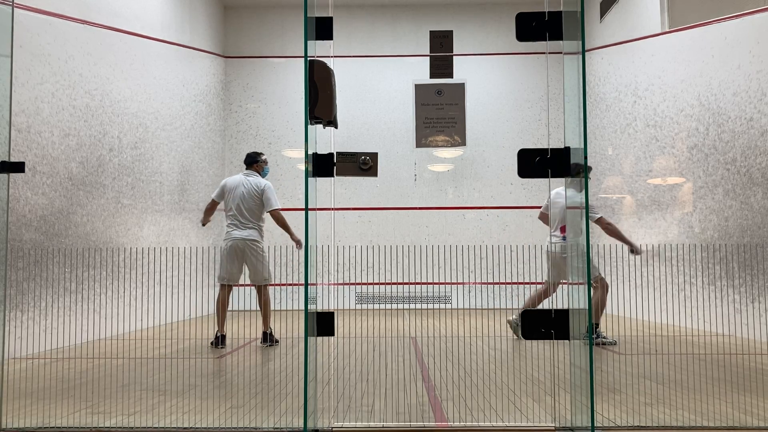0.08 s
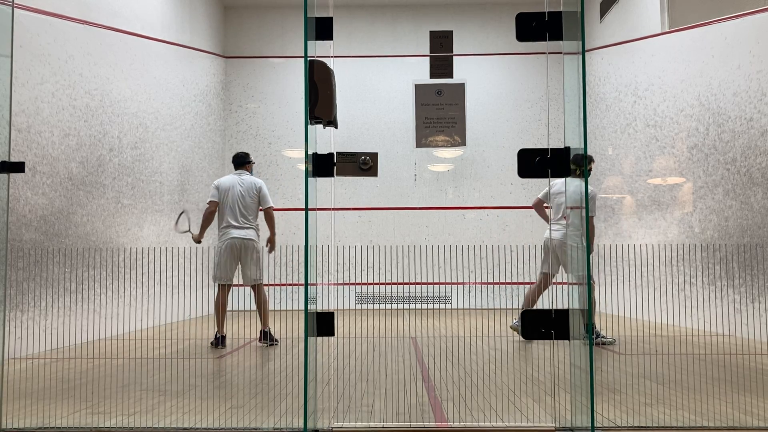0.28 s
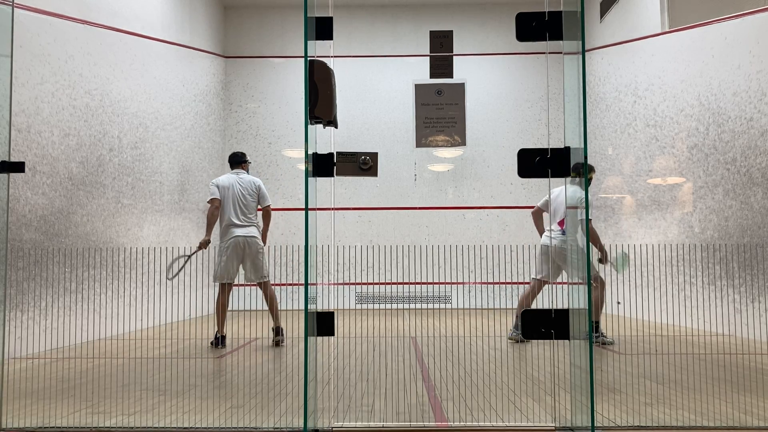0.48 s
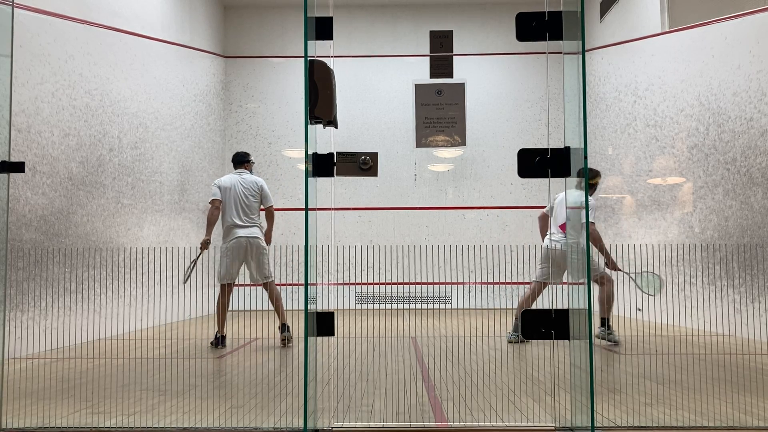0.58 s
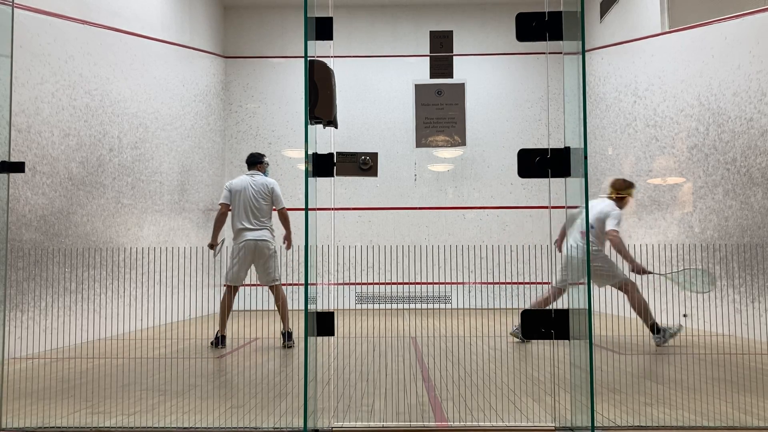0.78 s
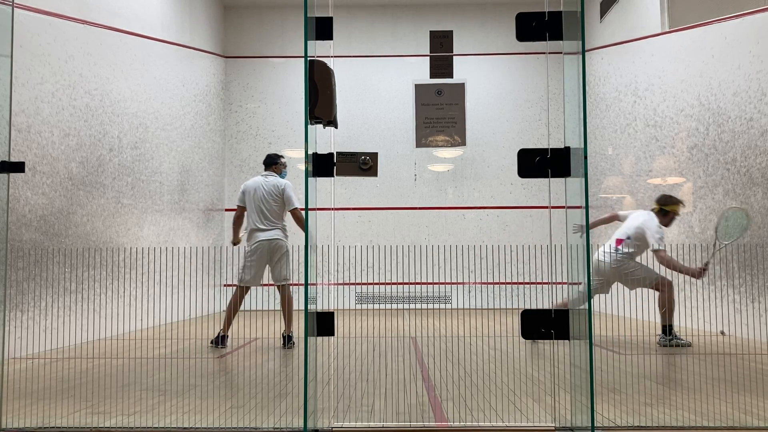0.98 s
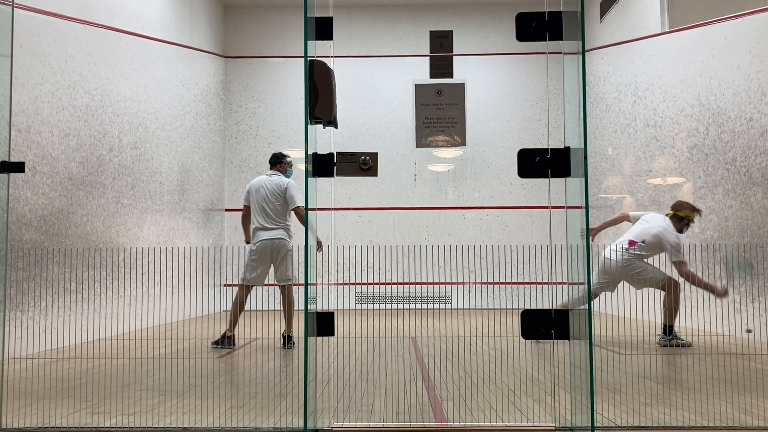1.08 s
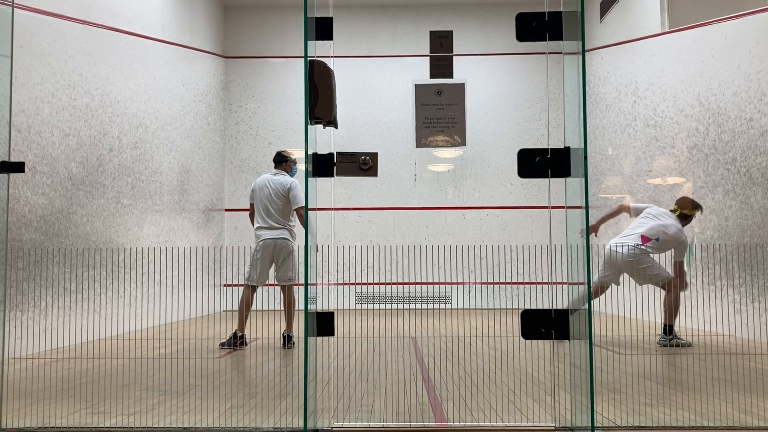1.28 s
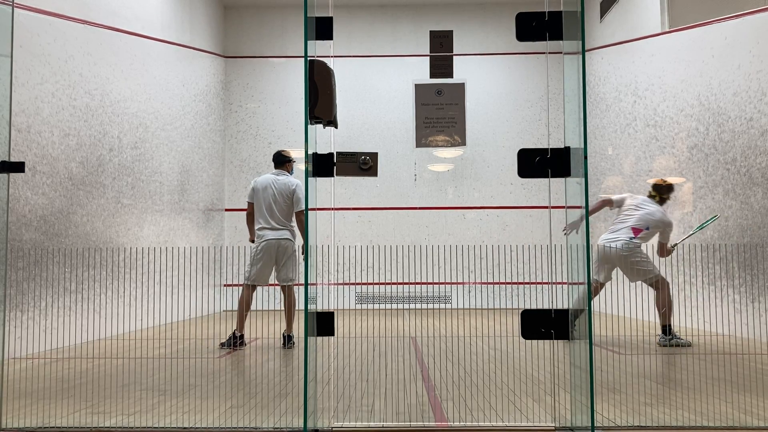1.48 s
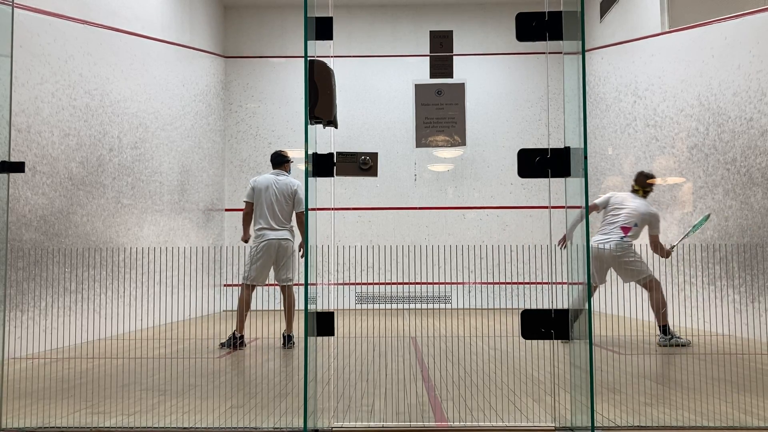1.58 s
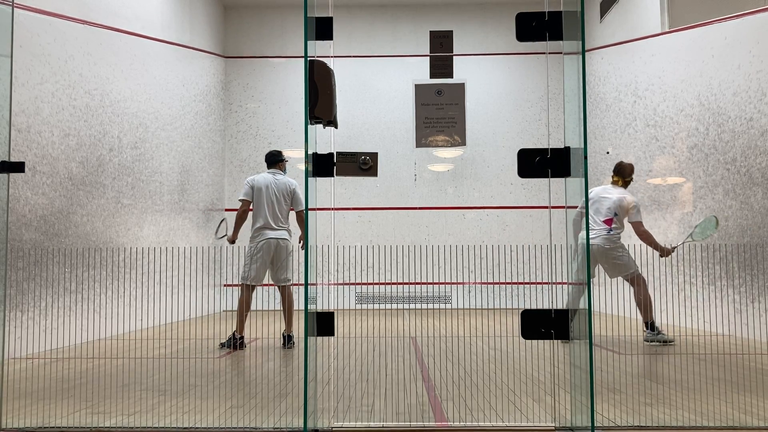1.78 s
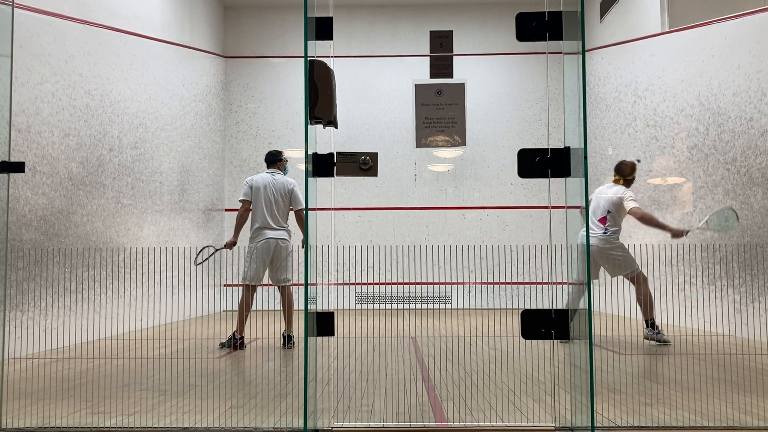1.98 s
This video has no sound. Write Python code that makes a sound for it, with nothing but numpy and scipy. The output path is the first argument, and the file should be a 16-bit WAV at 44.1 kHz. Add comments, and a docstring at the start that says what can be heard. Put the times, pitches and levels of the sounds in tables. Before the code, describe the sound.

In a bare reverberant squash court, a light knock leads straight into a hard racquet smack, then weaker ball knocks, scuffs and dull footfalls under the ringing tail, picked up in stereo from behind the back wall.

```python
"""A hard indoor squash court, heard from behind the glass back wall on two close microphone ports.
From the start, ventilation noise and fan hum fill the place, and shoes thump on the sprung floor throughout.
A faint hiss rises up to the first knock; ball knocks on racquet, wall and floor follow, with shoe scuffs.
Each is a short noise crack, then a panel thud of dying modes and slap echoes, under a long tail of shaped noise."""
import sys
import numpy as np
from scipy import signal
from scipy.fft import rfft, irfft, next_fast_len
from scipy.io import wavfile
from scipy.ndimage import uniform_filter1d

SR = 44100
rng = np.random.default_rng(int(sys.argv[2]) if len(sys.argv) > 2 else 0)


def unload_audio(sound):
    """Save the sound as a 16-bit wav file, at the path given as the first command line argument."""
    columns = np.transpose(np.atleast_2d(sound))
    # keep every value between -1 and 1, then stretch to whole-number steps
    steps = np.round(np.clip(columns, -1, 1) * 32767)
    wavfile.write(sys.argv[1], SR, steps.astype(np.int16))


N = 88200  # samples: two seconds


def amp(db):
    """Amplitude ratio of a level in dB."""
    return 10 ** (np.asarray(db) / 20)


def evened(x):
    """Scales a signal to an RMS of 1."""
    return x / np.sqrt(np.mean(x ** 2) + 1e-20)


def read(points, hz):
    """Reads a curve of (f/Hz, value) points along a log frequency axis."""
    f, value = np.transpose(points)
    return np.interp(np.log(hz + 1), np.log(f + 1), value)


def add(mix, s, sound):
    """Mixes a sound in at s seconds, cut off where the mix ends."""
    part = mix[..., round(s * SR):][..., :sound.shape[-1]]
    part += sound[..., :part.shape[-1]]


def ring(modes, rise_s):
    """A struck panel: exponentially dying sine modes under a soft start."""
    t = np.arange(SR // 2) / SR
    modes_sum = sum(amp(db - 60 * t / t60) * np.sin(2 * np.pi * hz * t) for hz, db, t60 in modes)
    return (1 - np.exp(-t / rise_s)) * modes_sum


def burst(length):
    """Quick rise and fall that peaks at 1 after half the length in seconds."""
    t = np.arange(SR // 10) / SR
    return 2 * t / length * np.exp(1 - 2 * t / length)


# Ventilation spectrum, before the whole is levelled: f/Hz, level/dB (density, relative)
AIR_SPECTRUM = [(15, -35), (25, 8), (141, -6), (277, -13), (416, -22), (531, -20), (575, -20), (962, -22.5),
                (1230, -33), (1790, -33.5), (2480, -43), (11300, -69), (16000, -122)]
AIR_DB = -34.5  # RMS level


def ventilation():
    """Air noise: random short-time spectra whose level wanders in soft patches of time and frequency."""
    hz = np.fft.rfftfreq(2048, 1 / SR)
    real, imag, patches = rng.standard_normal((N // 512 + 5, 1025, 2, 3)).T
    patches = uniform_filter1d(patches[0], 8, 0)
    patches = evened(uniform_filter1d(patches, 8, 1))
    level_db = read(AIR_SPECTRUM, hz)[:, None] + 3.3 * patches
    air = signal.istft((real + 1j * imag) * amp(level_db), nperseg=2048, noverlap=1536)[1]
    return amp(AIR_DB) * evened(air[:, :N])


# Fan hum bands: f/Hz, width/Hz, level/dB (RMS)
FAN_BANDS = [(79.4, 8.7, -40), (115.4, 12, -42)]


def hum():
    """Fan hum: noise in bands so narrow that each wavers like an unsteady tone."""
    hz = np.fft.rfftfreq(N, 1 / SR)
    total = 0
    for f, width, db in FAN_BANDS:
        peak = 1 / (1 + (2 * (hz - f) / width) ** 2)
        band = irfft(rfft(rng.standard_normal((2, N))) * peak, N)
        total = total + amp(db) * evened(band)
    return total


# Footfalls on the court: t/s, level/dB (added to each floor mode)
FOOTFALLS = [(.0, -35.5), (.19, -42), (.73, -31), (0.899, -44), (0.978, -30), (1.26, -41.5), (1.419, -35),
             (1.642, -28), (1.768, -36), (1.848, -34.5), (1.97, -48)]
# Sprung floor modes: f/Hz, level/dB (relative), t60/s
FLOOR_MODES = [(77.2, 9.5, 0.45), (121, 8.5, 0.083)]
STEP_RISE_S = 0.06


def footsteps():
    """Shoes on the sprung floor: each step sets the low floor modes ringing."""
    steps = np.zeros(N)
    for s, db in FOOTFALLS:
        add(steps, s, amp(db) * ring(FLOOR_MODES, STEP_RISE_S))
    return steps


HISS_END_S, HISS_DB = .163, -50.5  # end of the hiss, gain reached there
HISS_S, HISS_HZ = 0.063, 2000  # time in which it grows by 20 dB, high-pass corner


def rising_hiss():
    """Faint rising hiss: high-passed noise that swells exponentially, then stops at the first knock."""
    t = np.arange(N) / SR - HISS_END_S
    hiss = signal.lfilter(*signal.butter(1, HISS_HZ, "high", fs=SR), rng.standard_normal((2, N)))
    return amp(HISS_DB + 20 * np.minimum(t, 0) / HISS_S) * (t < 0) * hiss


# Centres at which the band levels of a knock are given: f/Hz
BAND_CENTRES = [100, 300, 1000, 2000, 3600, 6500, 11500]
# Court resonances: f/Hz, width/Hz, level/dB (boost)
RESONANCES = [(192.8, 8.5, 7), (252, 89, 6.5), (320, 7.6, 6), (358.3, 21, 6), (421, 8.5, 8),
              (801.6, 11.7, 5.5), (814.4, 80, 3), (871, 20, 4.5), (962, 20, 3), (1050, 51, 3.5),
              (1389, 17, 8), (1468, 7.6, 12), (1640, 30, 6), (2236, 28, 10)]


def coloured(x, bands_db, tilt_db=0):
    """Gives white noise a falling slope, the band levels, the court's resonances and a tilt in dB per octave."""
    hz = np.fft.rfftfreq(x.shape[-1], 1 / SR)
    resonances_db = sum(db / (1 + (2 * (hz - f) / w) ** 2) for f, w, db in RESONANCES)
    bands = read(list(zip(BAND_CENTRES, bands_db)), hz)
    gain = amp(bands + resonances_db + tilt_db * np.log2((hz + 50) / 1000))
    pink = np.sqrt(SR / 2 / (hz + 50))
    return irfft(rfft(x) * gain * pink, x.shape[-1])


CRACK_CUT_HZ = 720  # the crack carries little bass


def crack(length, crack_db, bright_db, bands_db):
    """The impact itself: a short burst of coloured, high-passed noise."""
    noise = coloured(rng.standard_normal(SR // 10), bands_db, bright_db)
    noise = signal.lfilter(*signal.butter(1, CRACK_CUT_HZ, "high", fs=SR), noise)
    return amp(crack_db) * noise * burst(length)


# Decay in the court: f/Hz, t60/s
COURT_DECAY = [(80, 1.4), (210, 1.33), (560, 1.63), (1470, 1.593), (3880, 0.89), (10200, 0.64)]
# Hall beyond the glass, a second decay: f/Hz, level/dB (against the court's), t60/s
HALL_DECAY = [(100, -13, 5), (315, -15, 2.5), (550, -8.5, 0.73), (840, -2.5, 2.33), (1510, -8.5, 2.66),
              (2400, -15.5, 1), (5730, -10.5, 1.08), (12000, -28.5, .8)]
# Tail build-up time, before each knock's stretch: f/Hz, t/s
BUILD_UP = [(100, .015), (1000, 0.022), (10000, 0.0083)]
PATCHY_DB = 1.1  # RMS unevenness of the clumps of reflections


def court_tail(stretch, bands_db):
    """Diffuse reverberation: two noise draws whose bands build up and die at their own speed."""
    noise = coloured(rng.standard_normal((2, 2 * SR)), bands_db)
    hz, t, spectra = signal.stft(noise, SR, nperseg=256, noverlap=192)
    court = amp(-60 * t / read(COURT_DECAY, hz)[:, None])
    f, hall_db, hall_t60 = np.transpose(HALL_DECAY)
    hall_level = read(np.c_[f, hall_db], hz)[:, None]
    hall = amp(hall_level - 60 * t / read(np.c_[f, hall_t60], hz)[:, None])
    rise = 1 - np.exp(-t / (stretch * read(BUILD_UP, hz)[:, None]))
    shape = np.hypot(court, hall) * rise
    patches = uniform_filter1d(rng.standard_normal(shape.shape), 5, 0)
    patches = evened(uniform_filter1d(patches, 9, 1))
    shape = shape * amp(PATCHY_DB * patches)
    return signal.istft(spectra * shape, SR, nperseg=256, noverlap=192)[1][:, :2 * SR]


# Panel modes, before the brightness tilt: f/Hz, level/dB (relative), t60/s
PANEL_MODES = [(111.4, 1.5, 0.14), (259, 3.5, 0.15), (345, -9, 0.017), (454, 5, .07), (795, -3, 0.13),
               (967, -3, 0.14), (1860, -13, .03), (2800, -17, 0.09)]
THUD_RISE_S, THUD_LAG_S = 0.0055, 0.0057
THUD_TILT = 0.43  # share of the crack's brightness that the thud takes


def thud(thud_db, bright_db):
    """The struck panel: its modes ring down, brighter when the crack is brighter."""
    tilt_db = THUD_TILT * bright_db
    modes = [(f, db + tilt_db * np.log2(f / 250), t60) for f, db, t60 in PANEL_MODES]
    return amp(thud_db) * ring(modes, THUD_RISE_S)


# Slaps off the court walls: t/s (delay), level/dB (added to each knock's slap level)
WALL_SLAPS = [(0.011, -10), (.041, -3), (0.084, -12)]
SMEAR_S = 0.0057  # the walls scatter each slap, which lengthens it
SLAP_TILT = 0.22  # share of the crack's brightness that the slaps keep


def add_slaps(mix, length, crack_db, bright_db, slap_db, bands_db):
    """Slap echoes: delayed, longer cracks with a smaller brightness tilt, each from fresh noise."""
    for delay, db in WALL_SLAPS:
        slap = crack(length + SMEAR_S, crack_db + slap_db + db, SLAP_TILT * bright_db, bands_db)
        add(mix, delay, slap)


# Knocks, scuffs and one far knock that swells slowly: t/s, crack length/s, crack over tail level/dB,
# crack brightness/(dB per octave), slap echo level/dB, thud level/dB, build-up stretch (factor),
# then tail level/dB at each of the band centres (before slope and resonances)
KNOCK_LIST = [(.161, 0.0042, 4, 0.5, -2, -51, 0.4, -47, -32.5, -34.5, -37, -39.5, -42.5, -41),
              (.313, 0.02, 2.5, -4.5, -2, -9.5, 0.75, -22.5, -21, -25.5, -24.5, -23, -23.5, -16),
              (.700, .02, -16, 9, -10, -65, 1.6, -52.5, -35.5, -35, -45.5, -43, -62.5, -75),
              (0.983, 0.013, -7.5, 3, 0, -73, 0.91, -61, -46, -77, -88, -78, -74, -61),
              (1.189, 0.008, 5, -3.5, -7, -76, 2.1, -56, -54, -63, -80, -86, -73.5, -62),
              (1.268, 0.002, 8, 4, -3.5, -39, 0.43, -53.5, -32.5, -52, -53.5, -53.5, -52, -47),
              (1.613, 0.011, 13.5, 1, -6.5, -32, 0.34, -42, -37, -44.5, -48, -49.5, -63.5, -65),
              (1.639, 0.0014, 5.5, 4, -10, -62, 0.55, -59, -68, -49.5, -57.5, -63, -59, -51.5),
              (1.673, 0.014, 11, 1.5, -1, -36, 0.75, -48, -41, -58.5, -55, -81, -69, -75)]


def knock(length, crack_db, bright_db, slap_db, thud_db, stretch, *bands_db):
    """One impact in the court: crack, thud and slaps go to the shared row, the tail to both rows."""
    sound = court_tail(stretch, bands_db)
    add(sound[0], 0, crack(length, crack_db, bright_db, bands_db))
    add(sound[0], THUD_LAG_S, thud(thud_db, bright_db))
    add_slaps(sound[0], length, crack_db, bright_db, slap_db, bands_db)
    return sound


def scene():
    """Row 0 is what both ports share, row 1 an unrelated diffuse draw."""
    field = ventilation() + hum()
    field[0] += footsteps()
    field += rising_hiss()
    for s, *settings in KNOCK_LIST:
        add(field, s, knock(*settings))
    return field


# Microphone colour: f/Hz, level/dB (gain)
MIC_COLOUR = [(25, -39), (50, -10.5), (75, -1), (500, 2), (570, -3.5), (670, -5), (740, 3), (4500, 8),
              (5600, 1.5), (7000, 4.5), (13000, -2.5), (16000, -14)]
# Likeness of the two ports: f/Hz, likeness (0 to 1)
PORT_LIKENESS = [(60, 0.91), (200, 1), (400, 0.49), (1000, 0.46), (2500, 0.14), (5000, 0.1), (7000, 1),
                 (15000, 1)]
# Lead of the left port, negative where it lags: f/Hz, lead/turns
LEFT_LEAD = [(0, 0), (800, 0), (2200, -.38), (4700, -.5), (6890, -1), (15790, -3)]
# Left port against right: f/Hz, level/dB (left minus right)
LEFT_OVER_RIGHT = [(60, 0), (110, -2.5), (200, -3), (380, 0.5), (700, 1.0), (1290, 1.5), (2380, 3),
                   (4400, 1), (8120, -1), (15000, 0.0)]
CEILING, EDGE_HZ = 0.7, 15900  # soft overload limit (full scale 1), upper band edge


def record(dry):
    """Two close ports differ in content, level and phase by frequency; then soft overload and a band limit."""
    size = next_fast_len(N + 4096)
    hz = np.fft.rfftfreq(size, 1 / SR)
    shared, diffuse = rfft(dry, size) * amp(read(MIC_COLOUR, hz))
    same = np.clip(read(PORT_LIKENESS, hz), 0, 1)
    near, apart = np.sqrt((1 + same) / 2), np.sqrt((1 - same) / 2)
    half_tilt = amp(read(LEFT_OVER_RIGHT, hz) / 2)  # each port takes half of the difference
    lead = 2 * np.pi * np.interp(hz, *np.transpose(LEFT_LEAD))
    left = (near * shared + apart * diffuse) * half_tilt * np.exp(.5j * lead)
    right = (near * shared - apart * diffuse) / half_tilt * np.exp(-.5j * lead)
    ports = irfft(np.array([left, right]), size)[:, :N]
    out = CEILING * np.tanh(ports / CEILING)
    low_pass = signal.firwin(511, EDGE_HZ, window=("kaiser", 9), fs=SR)
    return signal.oaconvolve(out, low_pass[None], "same")


dry = scene()
out = record(dry)
unload_audio(out)
```